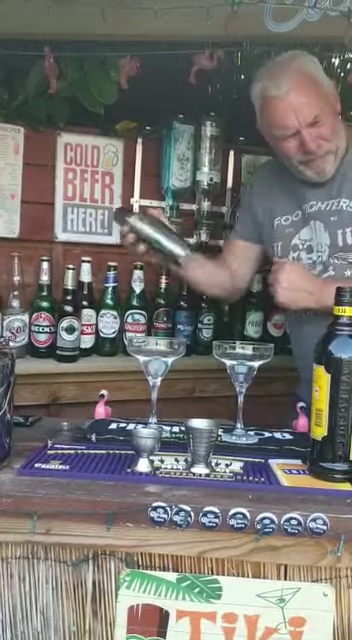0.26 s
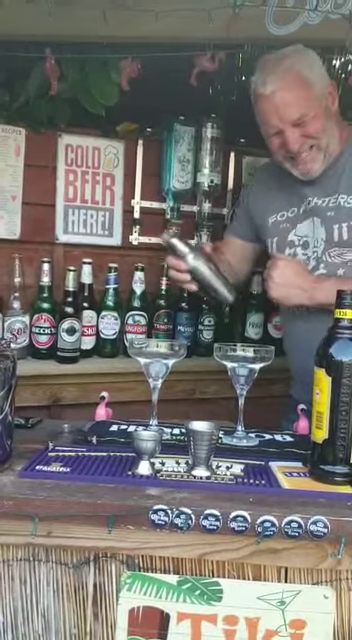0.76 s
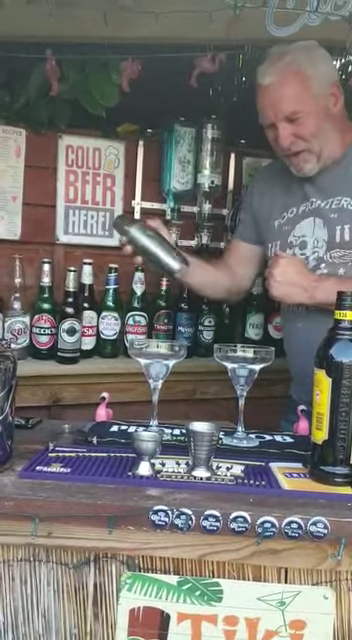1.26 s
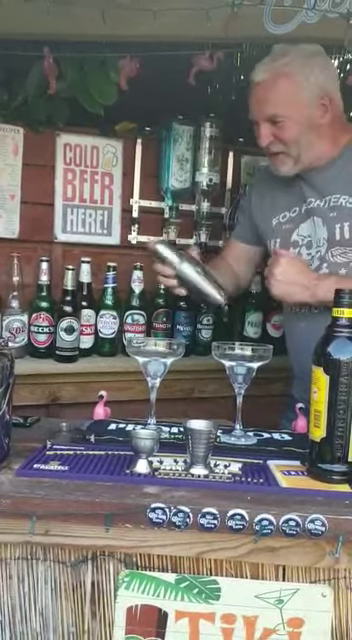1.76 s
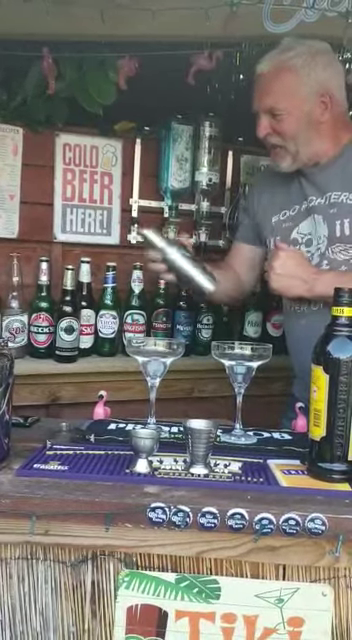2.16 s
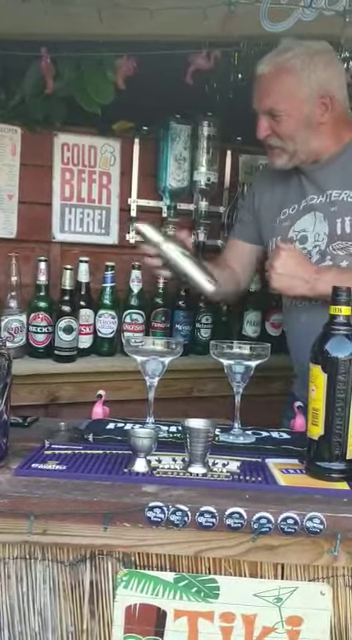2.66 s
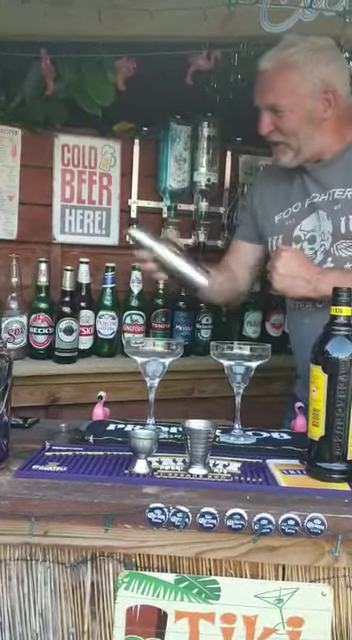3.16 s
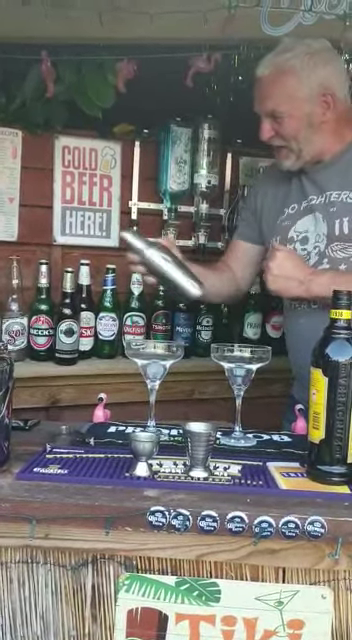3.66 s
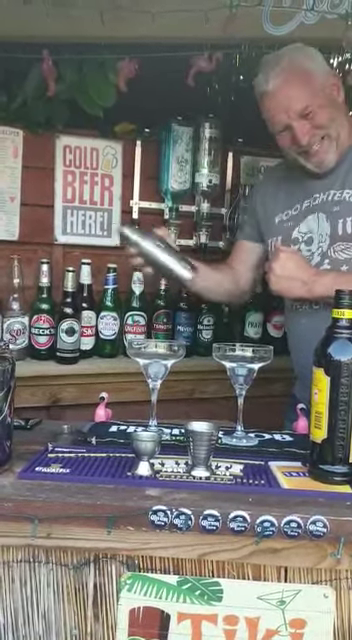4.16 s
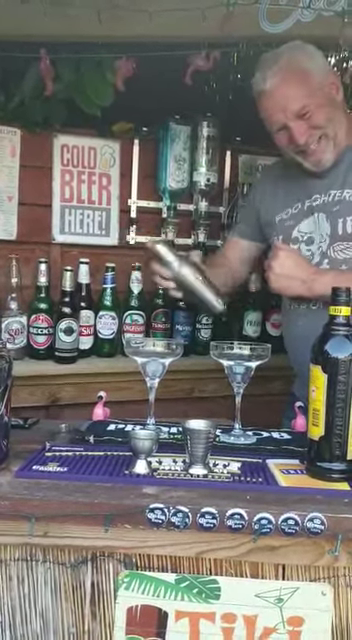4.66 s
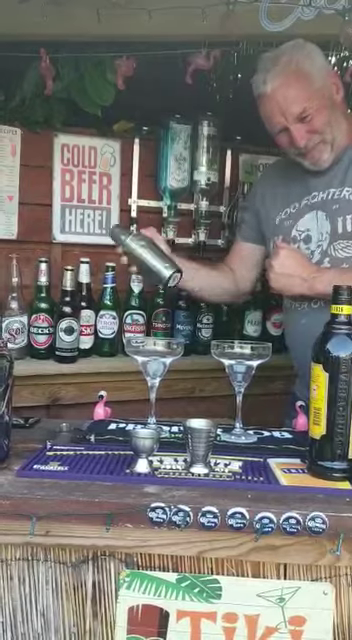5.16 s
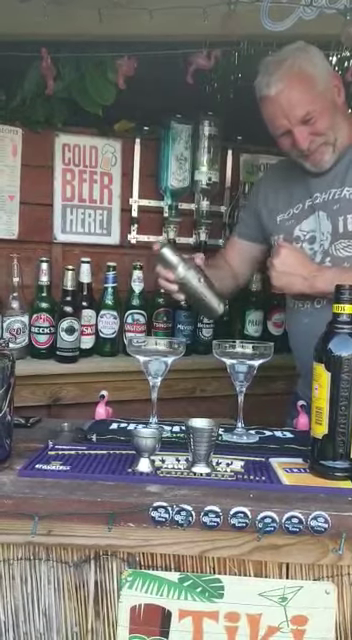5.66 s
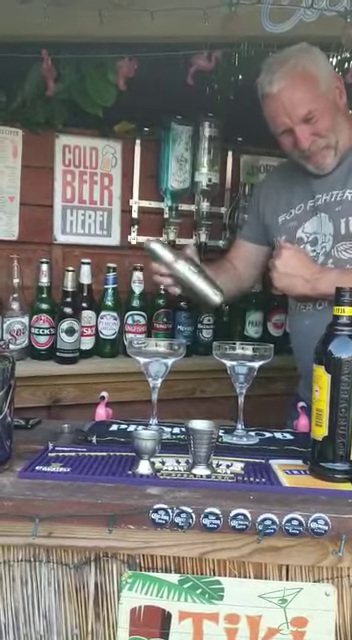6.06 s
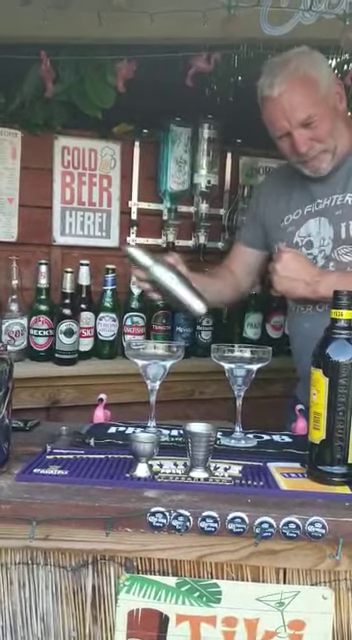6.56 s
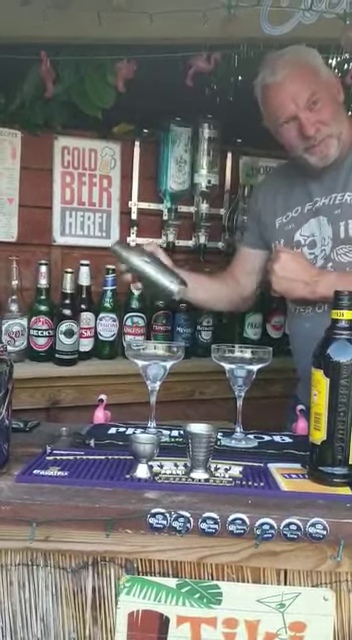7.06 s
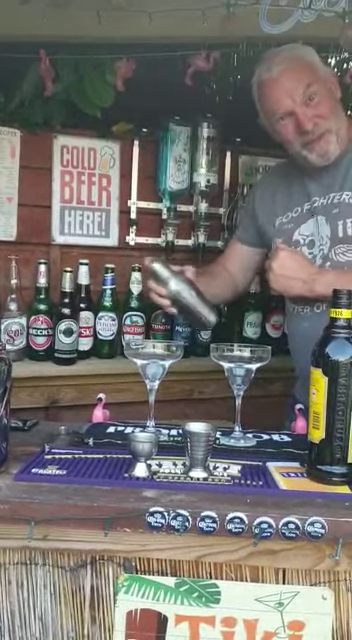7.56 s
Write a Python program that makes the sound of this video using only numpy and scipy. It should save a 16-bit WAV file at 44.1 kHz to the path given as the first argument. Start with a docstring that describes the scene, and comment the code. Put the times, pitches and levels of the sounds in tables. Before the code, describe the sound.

A steel cocktail shaker full of ice is shaken hard, about five times a second, rattling sharply in a small covered bar.

```python
"""Ice is shaken hard in a steel cocktail shaker, about five times a second, at a small covered bar.
The pile crashes in turn into the cap (bright) and the base (hollow): noise bursts drive the tin's modes.
Single cubes add a sharp noise crack and a damped sine knock; loose pieces keep the wall ringing between.
Early on the drink slaps the cap with two low decaying tones. Echoes of short noise tails surround it all.
A mains appliance hums faintly, as steady sines, over a low rumble of filtered noise that slowly grows."""
import sys
import numpy as np
from scipy import signal
from scipy.fft import rfft, irfft, next_fast_len
from scipy.io import wavfile
from scipy.ndimage import uniform_filter1d

SR = 44100
rng = np.random.default_rng(int(sys.argv[2]) if len(sys.argv) > 2 else 0)


def pcm_store(signal):
    """Save signal as 16-bit PCM."""
    levels = np.round(np.clip(np.atleast_2d(signal), -1, 1) * 32767)
    wavfile.write(sys.argv[1], SR, levels.astype(np.int16).T)


N = 344421  # samples


def amp(db):
    """Decibel law: amplitude ratio of a level in dB."""
    return 10 ** (np.asarray(db) / 20)


def unit(x):
    """Normalization to an rms of 1."""
    return x / np.sqrt(np.mean(x ** 2) + 1e-20)


def along(points, hz):
    """Logarithmic frequency scale: values interpolated between (frequency_hz, value) points."""
    f, v = np.transpose(points)
    return np.interp(np.log(hz + 1), np.log(f + 1), v)


def filtered(x, response):
    """Linear filtering: the spectrum of x times a complex response of frequency."""
    m = next_fast_len(N + SR // 2)
    hz = np.fft.rfftfreq(m, 1 / SR)
    return irfft(rfft(x, m) * response(hz), m)[..., :N]


# mains hum, levels before the left-right trim: frequency_hz [Hz], level_db [dB rms]
HUM_PARTIALS = [(49.6, -63), (99.8, -48.5), (199.5, -71.5), (299.3, -62), (399.1, -61)]
# spectrum of still air and distant rumble: frequency_hz [Hz], density_db [relative dB per Hz]
AIR_SPECTRUM = [(20, -34), (32, -22), (46, 8.5), (60, 2), (75, -1), (130, -18.5), (260, -16), (400, -33),
                (700, -9.5), (2000, -34), (16000, -45)]


def background():
    """Superposition of steady mains harmonics and low-frequency noise, a little to the left."""
    t = np.arange(N) / SR
    hum = sum(amp(db) * np.sqrt(2) * np.sin(2 * np.pi * (hz * t + rng.random()))
              for hz, db in HUM_PARTIALS)
    # mostly common to both channels, with a small independent part
    noise = rng.standard_normal(N) + 0.21 * rng.standard_normal((2, N))
    rumble = unit(filtered(noise, lambda hz: amp(along(AIR_SPECTRUM, hz))))
    rumble_db = np.interp(t, [0, 7.8], [-62, -53])
    left_right_trim_db = [[1.3], [-1.5]]
    return (hum + amp(rumble_db) * rumble) * amp(left_right_trim_db)


# modes of the hand-damped steel tin, before ring_db:
# frequency_hz [Hz], width_hz [Hz], level_db [dB over the plain click]
TIN_MODES = [(586, 193, 4), (895, 23, -7.5), (1119, 10, -2.5), (1310, 38, -7), (1376, 110, -4),
             (1633, 20, 3.5), (2162, 162, 10), (2440, 250, -2), (2676, 120, 1), (7900, 140, -32),
             (7880, 83, -17.5), (9780, 120, -12), (10230, 330, -4.5)]


def through_tin(force, colour, ring_db, size=4096):
    """Modal resonance: contact forces drive a causal, minimum-phase click of unit energy."""
    hz = np.fft.rfftfreq(size, 1 / SR)
    modes = sum(amp(db + ring_db) * 1j * hz * width / (centre ** 2 - hz ** 2 + 1j * hz * width)
                for centre, width, db in TIN_MODES)
    magnitude = amp(along(colour, hz)) * np.abs(1 + modes)
    # folding the cepstrum forward makes the click causal
    cepstrum = irfft(np.log(magnitude))
    cepstrum[1:size // 2] *= 2
    cepstrum[size // 2 + 1:] = 0
    click = irfft(np.exp(rfft(cepstrum)))[:size // 2]
    return signal.oaconvolve(force, click / np.linalg.norm(click))[:N]


def contacts(rate, scatter_db, fizz_db, even_s, t60):
    """Random collision process of rms 1: decaying noise bursts over a fizz of chips and liquid."""
    hits = rng.standard_normal(N), rng.random(N) < rate / SR  # rate in contacts per second
    blows = amp(scatter_db * hits[0]) ** 2 * hits[1]
    fall = float(amp(-60 / (t60 * SR))) ** 2  # energy kept per sample
    energy = signal.lfilter([1], [1, -fall], blows)
    energy = energy / energy.mean() + amp(fizz_db) ** 2
    # neighbouring contacts share the pile's momentum
    energy = energy / np.abs(uniform_filter1d(energy, max(int(even_s * SR), 2)))
    return unit(np.sqrt(energy) * rng.standard_normal(N))


def wall_pings(wall_hz=2220, wetting=0.065, t60=0.026, scatter_db=7.0, count=2400):
    """Mass loading: brief wall rings of rms 1, each detuned a little by the sloshing drink."""
    t = np.arange(SR // 25) / SR
    start = rng.integers(0, N, (count, 1))
    detune, strength = rng.standard_normal((count, 2)).T[..., None]
    hz = wall_hz * np.exp(wetting * detune)
    envelope = amp(scatter_db * np.clip(strength, -2, 2) - 60 * t / t60)
    pings = envelope * np.sin(2 * np.pi * hz * t)
    pings = pings * (1 - np.exp(-t / 0.00049))  # soft onset
    return unit(np.bincount((start + np.arange(len(t))).ravel(), pings.ravel(), N)[:N])


# colour of the loose contacts: frequency_hz [Hz], density_db [relative dB per Hz]
LOOSE_COLOUR = [(60, -23.5), (250, -12.5), (450, -16.5), (650, -7), (1100, -2.5), (1750, -2.5), (2300, 0.5),
                (3200, -2.5), (5500, -3.5), (10500, -7), (16000, -18)]
# loose pieces over one shake (0 = base, .5 = cap): they fly quietly towards the cap, then slide back
# along the wall: phase [share of the cycle], level_db [dB before looseness and layer gains]
TUMBLE_CYCLE = [(.05, -32.5), (.25, -36), (.42, -35.5), (.58, -33), (.75, -33), (.92, -30)]
# how freely the loose pieces rattle: time_s [s], level_db [dB added to the cycle]
LOOSENESS = [(0, 1), (.7, -0.5), (1.8, 0), (2.7, 1), (3.4, 1), (3.9, -2), (4.5, 1), (6.1, 1), (7.0, .5),
             (7.8, -2.5)]


def tumble():
    """Sustained excitation: loose pieces tick along the wall between crashes and keep it ringing."""
    t = np.arange(N) / SR
    landings = sorted(row[0] for row in list(BASE_THROWS) + list(CAP_THROWS))
    cycles = np.interp(t, landings, np.arange(len(landings)) / 2)
    cycle_db = np.interp(cycles, *np.transpose(TUMBLE_CYCLE), period=1)
    level_db = cycle_db + np.interp(t, *np.transpose(LOOSENESS))
    ticks = contacts(rate=300, scatter_db=6.5, fizz_db=-5.5, even_s=0.0346, t60=0.0033)
    rattle = amp(-0.5) * through_tin(ticks, LOOSE_COLOUR, ring_db=-5.0)
    return amp(level_db) * (rattle + amp(-9.5) * wall_pings())


# throws towards the base, a leading cube then the pile; levels before layer gains:
# start_s [s], knock_db [dB], crack_db [dB], pile_db [dB], lag_s [s]
BASE_THROWS = [(0.0313, -21.5, -23, -27.5, 0.0086), (0.2382, -17.5, -22.5, -26.5, 0.0024),
               (0.4372, -21, -19, -25, 0.0048), (0.645, -36, -22, -29.5, 0.005),
               (0.834, -27, -26, -28.5, 0.008), (1.0415, -22, -30, -28.5, 0.011),
               (1.2348, -23, -22, -30.5, 0.015), (1.446, -23, -28, -28.5, 0.0034),
               (1.6445, -20.5, -22, -28, 0.008), (1.8431, -19, -19.5, -32, 0.015),
               (2.0552, -18, -19, -32, 0.012), (2.2567, -17, -33, -31, 0.019),
               (2.4675, -18, -20, -29.5, 0.015), (2.681, -16, -27, -30.5, 0.016),
               (2.887, -16, -24.5, -28, 0.0061), (3.074, -17, -31, -30, 0.015),
               (3.2721, -18, -26, -29.5, 0.01), (3.4736, -22.5, -26, -31.5, 0.018),
               (3.6677, -19.5, -25.5, -28, 0.0041), (3.881, -24, -28, -30.5, 0.008),
               (4.075, -21.5, -32, -29.5, 0.003), (4.28, -26, -28, -28.5, 0.01),
               (4.504, -18.5, -26, -34.5, 0.011), (4.7157, -18.5, -26, -31.5, 0.012),
               (4.9256, -18.5, -34, -31.5, 0.0095), (5.1226, -22.5, -31, -34, 0.02),
               (5.3196, -15, -22.5, -34, 0.026), (5.534, -30, -21.5, -31.5, 0.01),
               (5.7335, -21.5, -20, -38.5, 0.023), (5.9485, -18, -19, -30.5, 0.0031),
               (6.159, -17, -36, -32.5, 0.024), (6.3639, -15.5, -19.5, -32.5, 0.027),
               (6.5694, -18.5, -29, -31, 0.017), (6.7826, -16.5, -23, -30.5, 0.005),
               (6.999, -24, -30, -29, 0.011), (7.201, -18.5, -19.5, -32, 0.037),
               (7.425, -25, -25, -31.5, 0.022), (7.6526, -16.5, -22.5, -33, 0.015)]
# throws towards the cap, levels before layer gains:
# start_s [s], crack_db [dB], pile_db [dB], lag_s [s]
CAP_THROWS = [(0.1365, -24.5, -29, 0.015), (0.347, -12.5, -25.5, 0.002), (0.54, -18.5, -27, 0.011),
              (0.7405, -20.5, -25, 0.0062), (0.9434, -19.5, -26, 0.012), (1.137, -18.5, -28.5, 0.014),
              (1.3416, -18.5, -35.5, 0.0098), (1.548, -24.0, -25.5, 0.0032), (1.749, -24.0, -24.5, 0.0065),
              (1.951, -21.5, -28, 0.013), (2.148, -21, -29, 0.028), (2.3669, -22.5, -25, 0.0018),
              (2.5767, -24.0, -23.5, 0.007), (2.789, -24.0, -26.0, 0.012), (2.9837, -17, -26, 0.0078),
              (3.1752, -14.5, -26.5, 0.008), (3.3769, -12, -27.5, 0.012), (3.5774, -14.5, -30, 0.018),
              (3.778, -22.5, -31.5, 0.016), (3.97, -19.5, -27.5, 0.023), (4.1915, -9.5, -29.5, 0.0024),
              (4.4083, -23, -29.5, 0.013), (4.611, -23, -31, 0.011), (4.8343, -17.5, -27, 0.0051),
              (5.0238, -27, -28.5, 0.0081), (5.225, -21.5, -29.5, 0.017), (5.4294, -22, -29.0, 0.015),
              (5.643, -19.5, -28.5, 0.005), (5.848, -19.5, -26.5, 0.0093), (6.057, -34, -31, 0.0055),
              (6.269, -21.5, -25.5, 0.0041), (6.48, -16.5, -30, 0.011), (6.684, -22, -26.5, 0.0015),
              (6.8912, -19, -25.5, 0.005), (7.1043, -16, -29.5, 0.0079), (7.318, -16.5, -31, 0.027),
              (7.5507, -23.5, -31, 0.014), (7.7632, -23.5, -33, 0.022)]
# single cubes apart from the leading one, levels before layer gains:
# start_s [s], crack_db [dB], knock_db [dB]
STRAYS = [(0.1646, -18, -31), (0.572, -20.5, -38), (1.1493, -16, -45), (1.2465, -20.5, -24),
          (1.3622, -21, -28), (1.9666, -21.5, -33), (2.5917, -21, -34), (3.159, -24, -32),
          (3.1954, -17, -41), (3.2974, -23, -21), (3.9932, -17, -23), (4.5168, -24, -25), (4.621, -14, -48),
          (4.7653, -28, -30), (5.0344, -15.5, -28), (5.4085, -26, -23.5), (5.515, -27, -26),
          (5.6712, -19, -38), (5.754, -31, -17.5), (5.9318, -21.5, -26), (6.0694, -20, -26),
          (6.1786, -25, -21.5), (6.2503, -27, -32), (6.3877, -38, -21.5), (6.4596, -22.5, -32),
          (6.5587, -25, -28), (6.7908, -39, -17.5), (6.9806, -23.5, -32), (7.561, -18, -23.5)]
CAP_KNOCK_DB = -14  # the cap takes a cube sharply: knock relative to crack, before layer gains


def cube_blows():
    """Discrete impacts: every throw's leading cube and the strays, as (start_s, crack_db, knock_db)."""
    on_base = [(s, crack_db, knock_db) for s, knock_db, crack_db, _, _ in BASE_THROWS]
    on_cap = [(s, crack_db, crack_db + CAP_KNOCK_DB) for s, crack_db, _, _ in CAP_THROWS]
    return on_base + on_cap + list(STRAYS)


# colour of the cracks: frequency_hz [Hz], density_db [relative dB per Hz]
CRACK_COLOUR = [(60, -30.5), (250, -15), (800, -15.5), (1700, -13.5), (2400, -0.5), (4000, -6.5), (7500, 2),
                (11000, -3), (16000, -15.5)]
CRACK_T60 = 0.003  # s
# the knock's median pitch [Hz], and its spread [log ratio] with the spot that is hit
KNOCK_HZ, KNOCK_SPREAD = 1340, 0.12


def cubes(chatter_db=-13, chatter_t60=0.032, knock_t60=0.0045):
    """Impact excitation: a noise crack with a short chatter, and a damped knock of the tin's end."""
    t = np.arange(SR // 20) / SR
    cracks, knocks = np.zeros(N + SR), np.zeros(N + SR)
    first = SR // 500  # blow levels refer to the first 2 ms
    crack_envelope = amp(-60 * t / CRACK_T60) + amp(chatter_db - 60 * t / chatter_t60)
    knock_envelope = amp(-60 * t / knock_t60) * (1 - np.exp(-t / 0.00015))
    for s, crack_db, knock_db in cube_blows():
        hz = KNOCK_HZ * np.exp(KNOCK_SPREAD * rng.standard_normal())
        crack = rng.standard_normal(len(t)) * crack_envelope
        knock = np.sin(2 * np.pi * hz * t) * knock_envelope
        cracks[round(s * SR):][:len(t)] += amp(crack_db) * crack / np.std(crack[:first])
        knocks[round(s * SR):][:len(t)] += amp(knock_db) * knock / np.std(knock[:first])
    hollow = [(100, -13), (400, -19.0), (700, -1.0), (1600, -0.5), (4000, 1.0), (16000, -15.0)]
    sharp = amp(1.6) * through_tin(cracks, CRACK_COLOUR, ring_db=-8.0)
    return sharp + amp(-5) * through_tin(knocks, hollow, ring_db=-6.0)


# colours of the pile's contacts and of its thud: frequency_hz [Hz], density_db [relative dB per Hz]
CLATTER_COLOUR = [(60, -29), (200, -19.5), (450, -14.5), (900, -19.5), (1700, -8.5), (2300, -1.5),
                  (3200, 1.5), (5000, -0.5), (7500, 0), (11000, -3.5), (13500, -11), (16000, -20)]
THUD_COLOUR = [(60, -15), (170, -14), (270, -6), (420, -19), (600, -4.5), (900, 3.5), (1400, 6),
               (1900, 5.5), (3000, -15), (6000, -44), (16000, -68)]
# a pile that lags is strung out and swells slowly:
# rise [share of the lag], fall_s [s], thud_db [dB over the clatter, before layer gains]
BASE_CRASH = (1, 0.01, -1.95)
CAP_CRASH = (0.74, 0.013, -9.5)
AHEAD_DB = -5.5  # little of the pile gets ahead of the leading cube


def pile():
    """Momentum transfer: contacts swell and die at each turn; drink and tin end add a hollow thud."""
    t = np.arange(N) / SR
    clatter, thud = np.zeros(N), np.zeros(N)  # energies
    for throws, crash in ((BASE_THROWS, BASE_CRASH), (CAP_THROWS, CAP_CRASH)):
        rise_share, fall, thud_db = crash
        for s, *_, pile_db, lag in throws:
            near = slice(max(int(s * SR) - SR // 8, 0), int(s * SR) + SR // 8)
            age = t[near] - s - lag
            swell = np.exp(-.5 * (age / np.where(age < 0, rise_share * lag, fall)) ** 2)
            swell = swell * np.where(t[near] < s, amp(AHEAD_DB) ** 2, 1)
            clatter[near] += swell * amp(pile_db) ** 2
            thud[near] += swell * amp(pile_db + thud_db) ** 2
    ice = np.sqrt(clatter) * contacts(rate=600, scatter_db=5.0, fizz_db=-8.5, even_s=0.0126, t60=0.0019)
    ends = np.sqrt(thud) * contacts(rate=300, scatter_db=11.0, fizz_db=-13.5, even_s=0.0192, t60=0.0023)
    bright = amp(2.5) * through_tin(ice, CLATTER_COLOUR, ring_db=-4.5)
    return bright + amp(3.5) * through_tin(ends, THUD_COLOUR, ring_db=4.5)


# the drink slaps the cap, ringing two low notes:
# start_s [s], level_db [dB before onset and room], pitch_hz [Hz], t60_s [s]
SLAPS = [(0.347, -35, 298, 0.045), (.348, -20.5, 533, 0.018)]


def slaps():
    """Damped oscillation: early on, the liquid lands in one lump with a short, dull thump."""
    t, out = np.arange(SR // 5) / SR, np.zeros(N)
    for s, db, hz, t60 in SLAPS:
        tone = amp(db - 60 * t / t60) * np.sin(2 * np.pi * hz * t)
        out[round(s * SR):][:len(t)] += tone * (1 - np.exp(-t / 0.0012))
    return out


# the shaker's place between the microphones: frequency_hz [Hz], left_minus_right_db [dB]
PAN = [(200, -1), (520, 10.5), (750, 4.5), (1150, 4.5), (1400, 6.5), (2100, 5.5), (2450, 7), (3000, 3),
       (4000, -1), (5800, -4), (7100, -0.5), (8000, -5.5), (10000, -4.5), (11500, 0.5), (13500, 2),
       (16000, 18)]
# direct sound by frequency, fullest near 1 kHz and weakest near 1.6 kHz;
# treble arrives about half direct, half reflected:
# frequency_hz [Hz], direct_db [dB before the power balance]
DIRECT = [(400, -2), (1000, 1.5), (1600, -4.5), (2300, -1), (3500, -0.5), (8000, -1.5)]


def bar(x, near_db=-7, near_t60=0.0052, early_db=-3, early_t60=0.055, late_db=-13, late_t60=0.24,
        lead_s=.000062, count=8):
    """Reverberation: counter, wall and roof answer, each contact's echoes taking other paths."""
    t = np.arange(SR // 4) / SR

    def fade(db, t60, delay):
        """Exponential decay of echo energy after a gradual onset."""
        decay = amp(-60 * t / t60) * (1 - np.exp(-(t / delay) ** 2))
        return amp(db) ** 2 * unit(decay) ** 2

    energy = fade(near_db, near_t60, .0001) + fade(early_db, early_t60, 0.0011)
    energy = energy + fade(late_db, late_t60, 0.01)
    shape = np.sqrt(energy / len(t))
    tails = shape * rng.standard_normal((count, 2, len(t)))
    # the share sent to each tail wanders every 5 ms, at constant total power
    knots = np.arange(0, N + SR // 200, SR // 200)
    shares = np.array([np.interp(np.arange(N), knots, row)
                       for row in rng.standard_normal((count, len(knots)))])
    shares /= np.linalg.norm(shares, axis=0)
    wet = sum(signal.oaconvolve((x * share)[None], tail, axes=1)[:, :N]
              for share, tail in zip(shares, tails))
    # long waves reach both microphones alike: frequency_hz, left-right correlation
    coherence = [(200, 0.85), (700, 0.47), (1500, 0.27), (3000, 0.23)]

    def mid_side(hz):
        angle = np.arccos(np.clip(along(coherence, hz), -1, 1)) / 2
        return np.array([np.cos(angle), np.sin(angle)])

    mid, side = filtered(wet, mid_side)
    sides = np.array([[1], [-1]])  # left, right
    direct = filtered(x, lambda hz: amp(along(DIRECT, hz)) * np.exp(1j * np.pi * hz * lead_s * sides))

    def balance(hz):
        pan = np.sqrt(2 / (1 + amp(-sides * along(PAN, hz)) ** 2))
        # what misses the direct path is not lost
        power = amp(along(DIRECT, hz)) ** 2 + np.sum(shape ** 2)
        return pan * np.sqrt(1.456 / power)

    return filtered(direct + mid + sides * side, balance)


def scene():
    """Superposition: the shaker's sounds share the bar's echoes; the background is added dry."""
    return bar(pile() + tumble() + cubes() + slaps()) + background()


TOP_HZ = 16000  # band limit


def record(dry):
    """Saturation and band limiting: peaks are rounded off at full scale, then the top is removed."""
    rounded = dry / (1 + dry ** 4) ** (1 / 4)
    return filtered(rounded, lambda hz: hz < TOP_HZ)


dry = scene()
out = record(dry)
pcm_store(out)
```